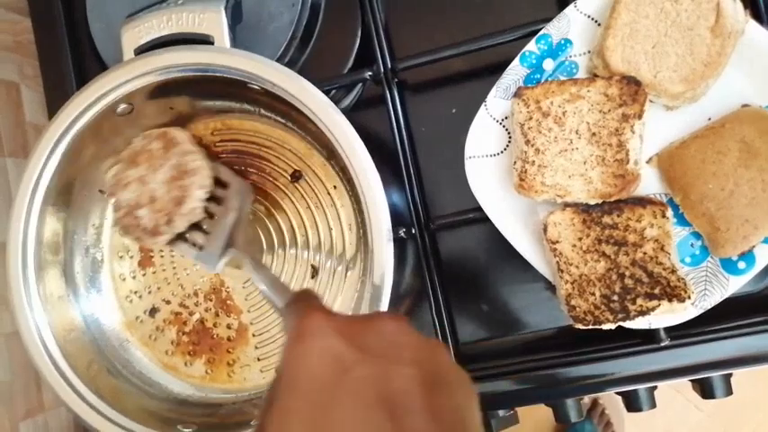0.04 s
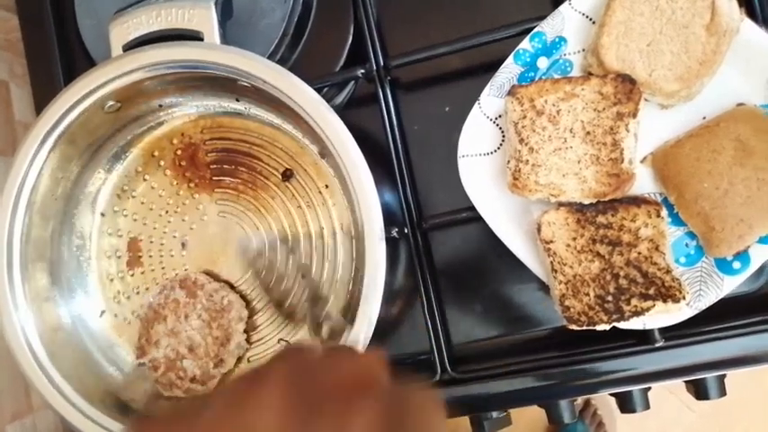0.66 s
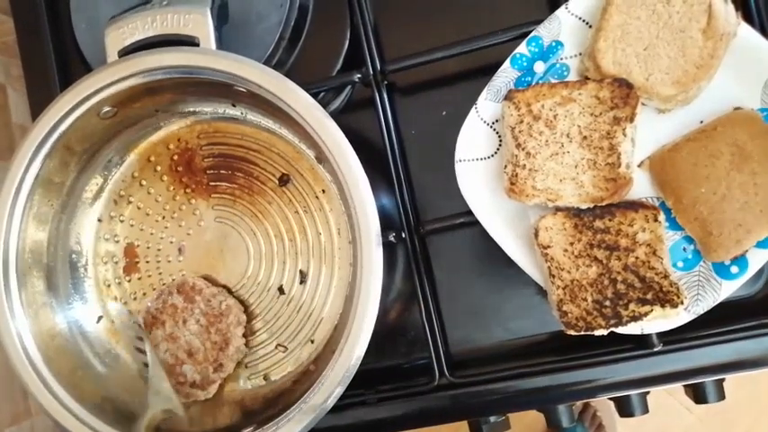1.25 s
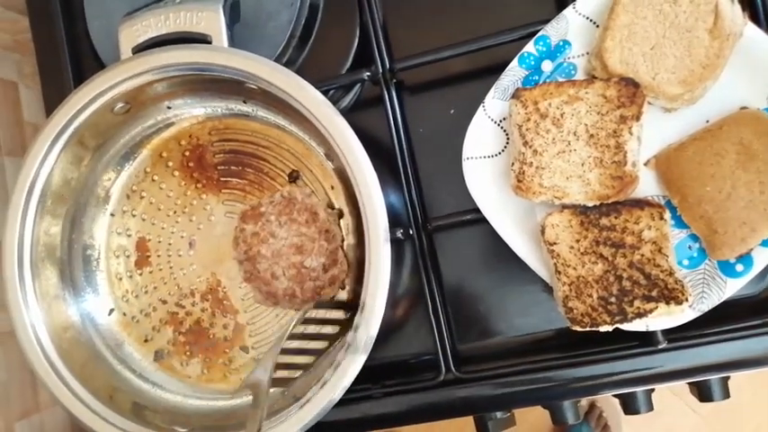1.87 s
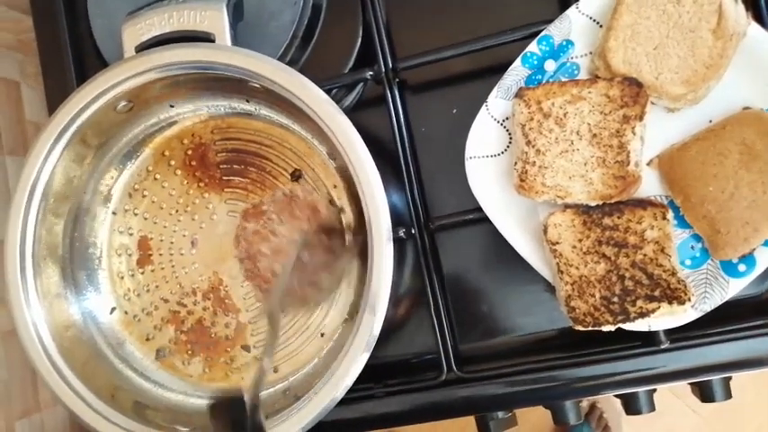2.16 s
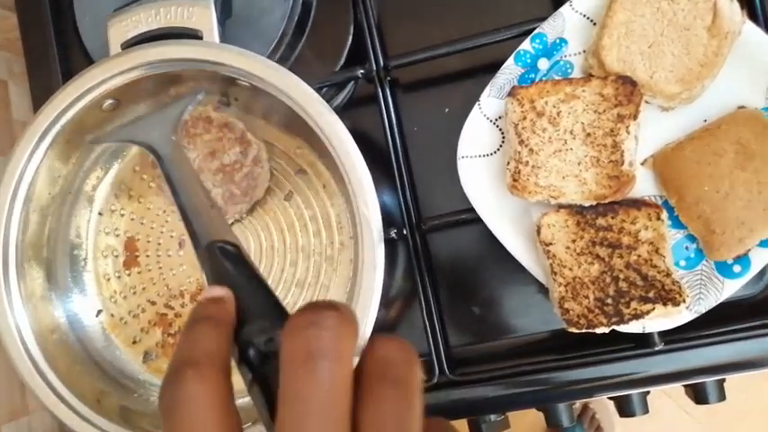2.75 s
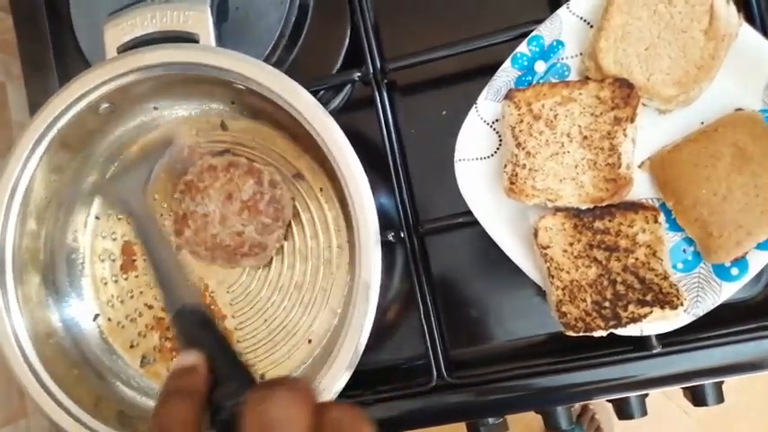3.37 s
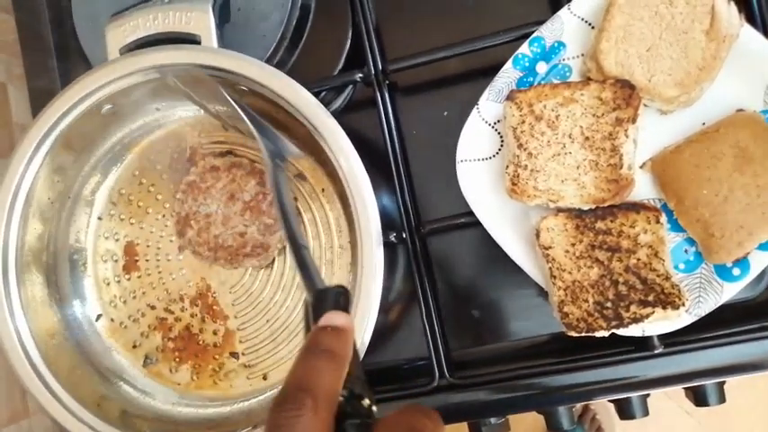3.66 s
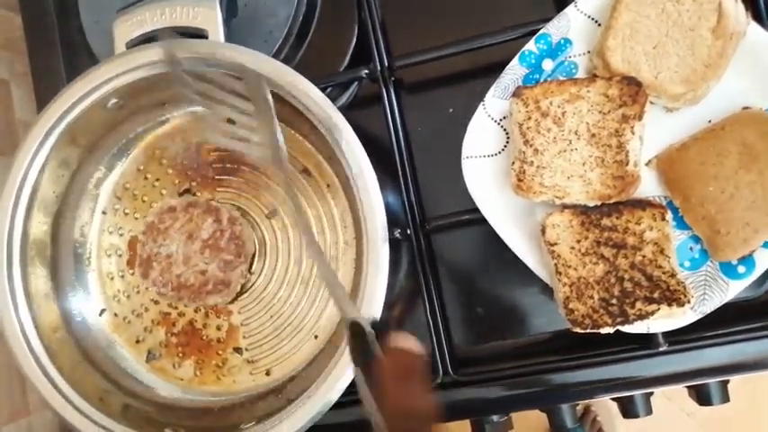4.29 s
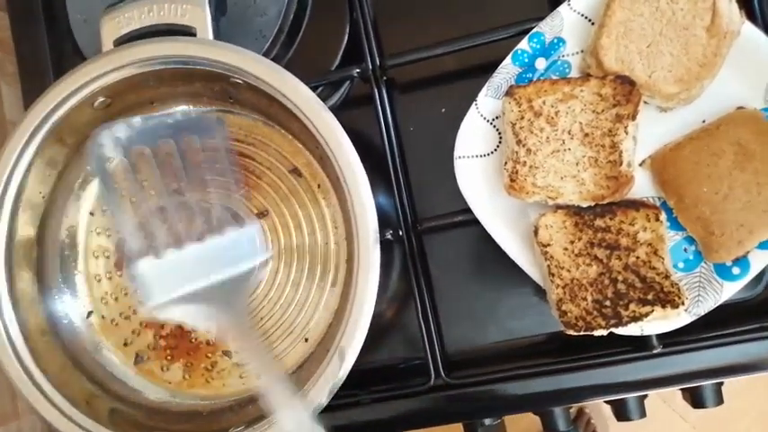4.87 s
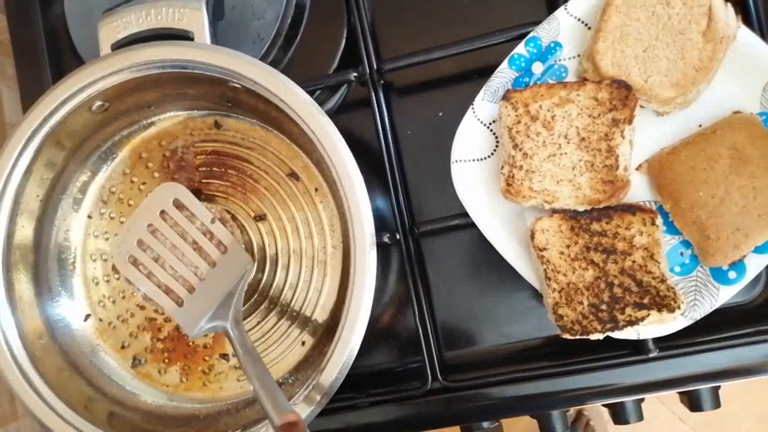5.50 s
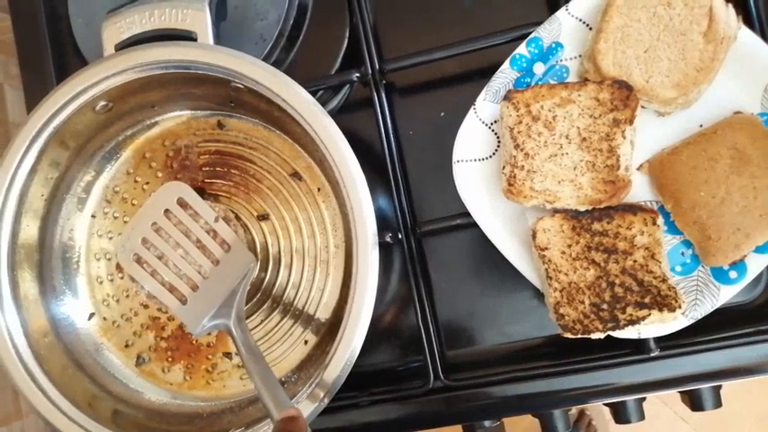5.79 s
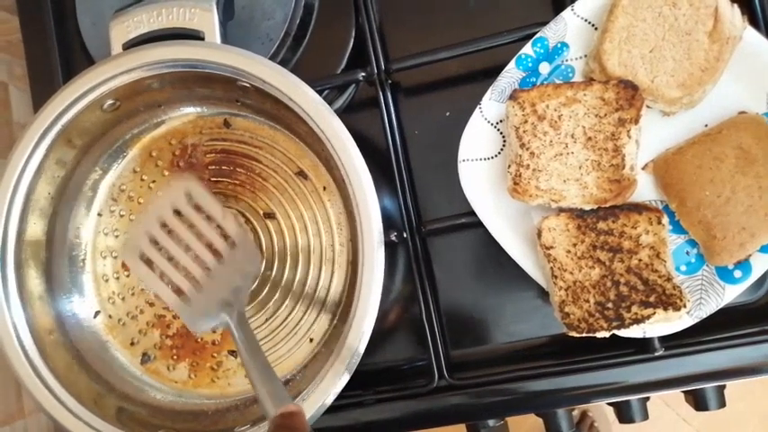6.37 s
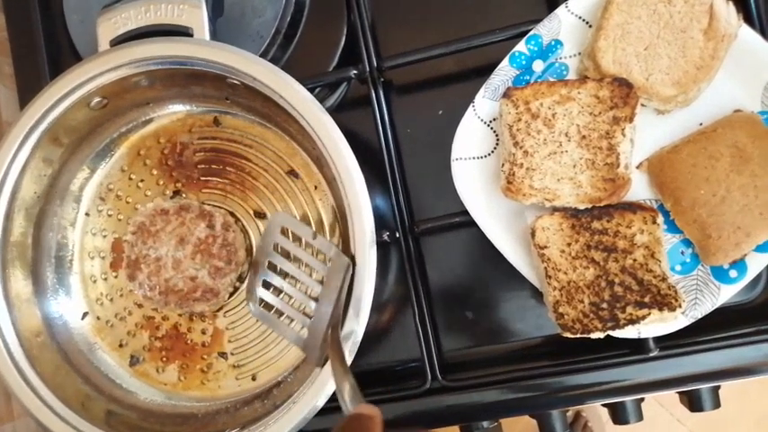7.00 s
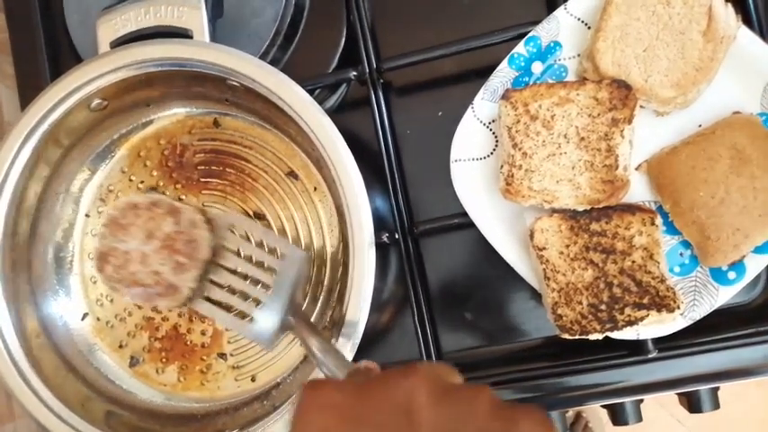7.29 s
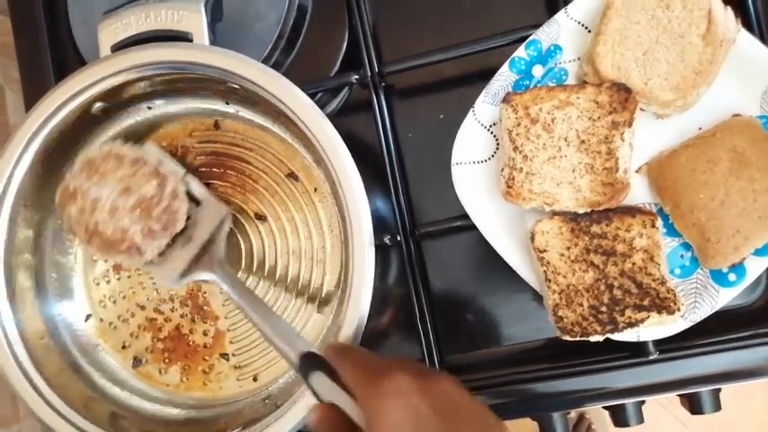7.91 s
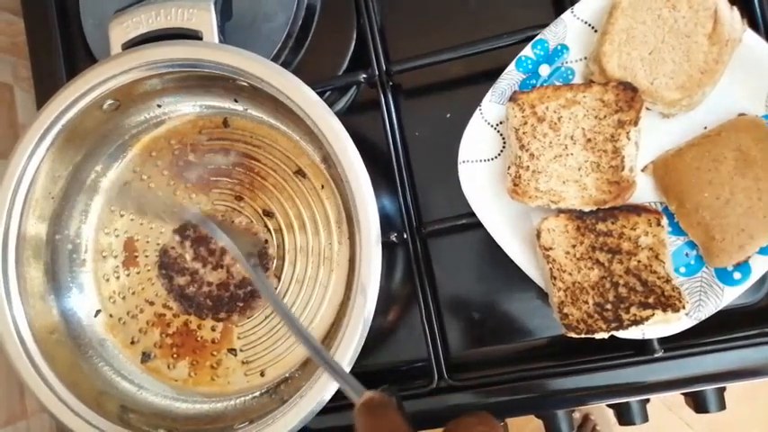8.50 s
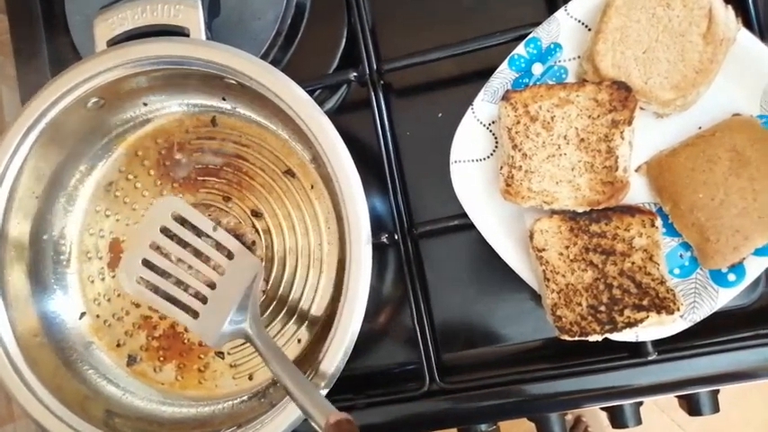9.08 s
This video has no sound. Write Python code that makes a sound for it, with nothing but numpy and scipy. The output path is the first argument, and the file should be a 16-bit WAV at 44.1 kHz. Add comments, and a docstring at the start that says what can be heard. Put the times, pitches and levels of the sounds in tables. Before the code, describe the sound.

A meat patty sizzles in a thin film of oil in a steel pan, heard close up in a small kitchen. A metal spatula scrapes under it and knocks the pan repeatedly, each hit ringing briefly. Midway the spatula rests and the sizzle softens, with a few sharp spits of fat. Then the clatter and scraping return, the patty flops over with a soft thump, and the frying swells, coarser than before.

```python
"""Patty frying in a steel pan

Close by in a small kitchen, a meat patty sizzles in a thin film of oil over a gas burner. Countless
steam bubbles burst under it, harder and coarser when it is pushed onto fresh hot metal, and fat spits.
A slotted metal spatula skids, scrapes under the meat and hits the wall, ringing its blade and the pan."""
import sys
import numpy as np
from scipy import signal
from scipy.fft import rfft, irfft, next_fast_len
from scipy.io import wavfile

SR = 44100
rng = np.random.default_rng(int(sys.argv[2]) if len(sys.argv) > 2 else 0)


def wrap_up_sound(samples):
    """Save the sound to the file named by the first command line argument, as 16-bit audio."""
    columns = np.atleast_2d(samples).T
    # keep every value between -1 and 1, then stretch to whole-number steps
    tamed = np.clip(columns, -1, 1)
    steps = np.round(tamed * 32767).astype(np.int16)
    wavfile.write(sys.argv[1], SR, steps)


N = 407925


def from_db(db):
    """Decibels to gain."""
    return np.exp(np.asarray(db) * (np.log(10) / 20))


def rms_one(x):
    """Scale to rms 1."""
    return x / np.sqrt(np.mean(x ** 2) + 1e-20)


def energy_one(x):
    """Scale each channel to energy 1."""
    return x / np.sqrt(np.sum(x ** 2, axis=-1, keepdims=True) + 1e-20)


def automation(points):
    """A (t/s, value) curve at every sample."""
    return np.interp(np.arange(N) / SR, *np.transpose(points))


def on_bins(points, size):
    """A (f/Hz, value) curve on the bins of an FFT."""
    hz, value = np.transpose(points)
    return np.interp(np.log(np.arange(size // 2 + 1) * SR / size + 1), np.log(hz), value)


def response(points, size=4096):
    """Minimum-phase impulse response of a (f/Hz, level/dB) EQ curve."""
    cepstrum = irfft(np.log(from_db(on_bins(points, size))))
    cepstrum[1:size // 2] *= 2
    cepstrum[size // 2 + 1:] = 0
    return irfft(np.exp(rfft(cepstrum)))


def through(x, impulse):
    """Convolve, keeping the length."""
    return signal.oaconvolve(x, impulse)[:len(x)]


def band(x, low_hz, high_hz, order=2):
    """Butterworth band-pass."""
    sos = signal.butter(order, [low_hz, min(high_hz, .45 * SR)], "band", fs=SR, output="sos")
    return signal.sosfilt(sos, x + 1e-18)


def drift(per_s):
    """Random modulation of rms 1."""
    knots = rng.standard_normal(int(N / SR * per_s) + 2)
    return rms_one(np.interp(np.arange(N) / SR * per_s, np.arange(len(knots)), knots))


def add(track, s, sound):
    """Mix a sound in at time s."""
    start = max(0, round(s * SR))
    track[start:start + len(sound)] += sound[:N - start]


def noise_tail(t60):
    """Noise of energy 1 that dies by 60 dB in t60 seconds."""
    t = np.arange(SR // 2) / SR
    return energy_one(rng.standard_normal(len(t)) * from_db(-60 * t / t60))


def ring(force, modes):
    """Damped modes driven by one force; each mode's level sets its energy."""
    out = np.zeros(len(force))
    for hz, level_db, t60 in modes:
        radius, angle = np.exp(-np.log(1000) / (t60 * SR)), 2 * np.pi * hz / SR
        mode = signal.lfilter([1, 0, -1], [1, -2 * radius * np.cos(angle), radius ** 2], force + 1e-18)
        out += from_db(level_db) * energy_one(mode)
    return out


def crackle(per_s, spread_db):
    """Random clicks, many weak and a few strong, of even power whatever their rate."""
    chance = np.clip(per_s / SR, 1e-4, 1)
    strength = from_db(spread_db * np.minimum(rng.exponential(1, N), 5.5)) * rng.choice([-1, 1], N)
    return rms_one((rng.random(N) < chance) * strength / np.sqrt(chance))


def noise_bed(eq, side_db=-7, waver_db=0.0):
    """Coloured noise in narrow stereo, with an optional waver in level."""
    mid, side = (rms_one(through(rng.standard_normal(N), response(eq))) for _ in range(2))
    return (mid + from_db(side_db) * side * [[1], [-1]]) * from_db(waver_db * drift(10))


# Tone of a burst inside the pan: f/Hz, level/dB
PAN_EQ = [(200, -23), (450, -42), (700, -18.5), (1300, -15.5), (2000, -13.5), (2800, -12), (4000, -13.5),
          (5300, 1.5), (6600, -4.5), (9800, -6), (11200, -9.5), (13500, -3.5), (14950, 6), (15800, -5)]
# Bubble sizes, large to finest spray: low f/Hz, high f/Hz, bursts per s, strength spread/dB,
# level/dB at mean vigour, dB per dB of vigour, dB per dB of splutter
BUBBLE_SIZES = [(446, 2130, 450, 2.5, -57.5, 0.9141, 0.94), (2326, 3930, 1100, 3, -52.5, 1.09, 0.5),
                (3690, 7620, 3400, 2.5, -42, 1, -0.22), (8260, 12000, 2700, 4, -48, 0.9845, 0.3),
                (11970, 15320, 6000, 4, -46, 0.77, 0.5)]


def sizzle(vigour_db, splutter_db, spot_count=4):
    """Steam bubbles burst around the pan, a band per size; snaps across all bands sink as vigour rises."""
    snaps = from_db(-7 - 0.23 * np.maximum(vigour_db, 0)) * crackle(per_s=400, spread_db=4.5)
    cluster_db = 0.13 * drift(110)   # bubbles burst in small clusters
    spot_of = rng.integers(0, spot_count, N)
    colour, spots = response(PAN_EQ, size=1024), np.zeros((spot_count, N))
    for low_hz, high_hz, per_s, spread_db, level_db, by_vigour, by_splutter in BUBBLE_SIZES:
        clicks = crackle(per_s * from_db(0.85 * vigour_db), spread_db) + snaps   # harder means denser
        clicks = rms_one(clicks * from_db(cluster_db + 1.55 * drift(35)))
        clicks *= from_db(level_db + by_vigour * vigour_db + by_splutter * splutter_db)
        burst = energy_one(band(colour, low_hz, high_hz, order=3))
        for k in range(spot_count):
            spots[k] += through(clicks * (spot_of == k), burst)
    return sum(kitchen(spot, room_db=-3.0, echo_db=2.5) for spot in spots)   # each has its own echoes


# Body of the simmer: f/Hz, level/dB
SIMMER_EQ = [(25, 2.5), (45, -6), (100, -3.5), (190, 1.5), (330, -0.5), (500, -0.5), (680, 9),
             (1000, -17.5), (2000, -10)]


def simmer(vigour_db, splutter_db):
    """A dull, wavering simmer under the meat rides the vigour and the splutter."""
    return from_db(-72.5 + 0.52 * vigour_db + splutter_db) * noise_bed(SIMMER_EQ, waver_db=5.0)


# Tone of the gas flame: f/Hz, level/dB
BURNER_EQ = [(20, -21), (40, 11.5), (70, 1), (110, -5), (160, -6), (195, 7), (225, -8), (300, -6),
             (450, -5), (1000, -22), (3000, -19)]


def burner():
    """The gas burner lays a low, steady rush under everything."""
    return from_db(-76.5) * noise_bed(BURNER_EQ)


# Dense, short resonances of metal on metal, for grit, ticks and clatter: f/Hz, level/dB
METAL_EQ = [(120, -47), (330, -24), (700, 5.5), (1500, 3), (2800, 5), (4000, -7), (5500, 9), (7500, 10.5),
            (15000, -39)]
# Modes of the rubbed pan floor: f/Hz, level/dB, t60/s
HISS_MODES = [(5150, -2, .025), (5230, 0, .03), (5355, -1, .03), (5495, 1, .028)]
# Modes of the scraping edge: multiple of the rasp's pitch, level/dB, t60/s
EDGE_MODES = [(.93, 0, 0.01), (1.0, 1, 0.014), (1.1, 1, 0.0088)]
# The blade shoves under the patty or presses on it:
# t/s, length/s, level/dB, rasp f/Hz, hiss over rasp/dB
SHOVE_CUES = [(0, 0.088, -37, 2920, 0), (0.137, 0.19, -47, 2800, -10), (0.427, 0.11, -44.5, 2680, 5),
              (2.208, 1, -54, 2960, 7.5), (6.19, 0.14, -61.5, 2920, 3), (7.307, 0.15, -45.5, 2650, 4),
              (7.45, 0.21, -38, 2600, -1.5), (7.684, 0.091, -46, 2650, 2.5), (7.725, .012, -40, 2550, 1),
              (7.808, 0.19, -48.5, 2830, 2.5)]


def scraping(attack_s=0.0033, release_s=0.021, judder_db=3.0, grit_db=-16):
    """The edge sticks and slips on the crust: a rasp pitched by blade angle, pan-floor hiss, dry grit."""
    out, t = np.zeros(N), np.arange(N) / SR
    slips = crackle(per_s=700, spread_db=2.5) * from_db(judder_db * np.tanh(drift(70)))
    hiss = rms_one(band(ring(slips, HISS_MODES), 4140, 10400))
    grit = rms_one(band(through(slips, response(METAL_EQ)), 1200, 15000))
    for s, length_s, level_db, rasp_hz, hiss_db in SHOVE_CUES:
        pressure = np.clip((t - s) / attack_s, 0, 1) * np.exp(-np.maximum(t - s - length_s, 0) / release_s)
        modes = [(rasp_hz * multiple, db, t60) for multiple, db, t60 in EDGE_MODES]
        rasp = rms_one(band(ring(slips, modes), 1900, 3600))
        out += from_db(level_db) * pressure * (rasp + from_db(hiss_db) * hiss + from_db(grit_db) * grit)
    return kitchen(out, room_db=-4.5)


# The edge catches: t/s, dry peak/dB, centre f/Hz
CATCH_CUES = [(0.007, -19, 3300), (0.517, -28, 2600), (0.527, -27, 2600), (7.452, -22, 2500),
              (7.4648, -15, 2500), (7.531, -20, 2100), (7.6057, -19, 2500), (7.7133, -19, 2400),
              (7.8092, -17, 3100), (7.8207, -17, 2800), (7.826, -23, 2600), (7.883, -23, 1700),
              (7.941, -23, 4500), (9.0737, -24, 2600)]


def catches(width_ratio=1.62, ring_db=-13):
    """The edge snaps free of the crust: one metal tick, damped at once by the meat."""
    out, colour = np.zeros(N), response(METAL_EQ)
    for s, peak_db, hz in CATCH_CUES:
        tick = band(colour, hz / width_ratio, hz * width_ratio)
        tick += from_db(ring_db) * through(tick, noise_tail(t60=0.008))
        add(out, s, from_db(peak_db) * tick / np.abs(tick).max())
    return kitchen(out, room_db=-3.0, echo_db=-9.0)


# Featured spits of fat: t/s, level/dB before the trim
SPIT_CUES = [(0.099, -30), (0.387, -28), (0.6165, -20), (1.4555, -20), (4.8625, -31), (5.168, -29),
             (5.1835, -25.5), (5.4513, -28), (5.5093, -24), (6.087, -21.5), (6.1603, -21.5), (6.1835, -14),
             (6.4347, -41.5), (8.7948, -20), (8.9553, -20)]


def spits(vigour_db, strays_per_s=1.6, stray_db=-36, snap_hz=5590, width_ratio=1.09, trim_db=-5):
    """Water drops burst out of the fat, on cue and at random: a bright snap over a fainter, lower pop."""
    out, colour = np.zeros(N), response(PAN_EQ)
    pop = band(colour, 420, 2600)
    stray_samples = np.flatnonzero(rng.random(N) < strays_per_s / SR)
    strays = [(i / SR, stray_db + vigour_db[i]) for i in stray_samples]
    for s, level_db in list(SPIT_CUES) + strays:
        hz = snap_hz * np.exp(0.032 * rng.standard_normal())
        snap = band(colour, hz / width_ratio, hz * width_ratio)
        spit = snap / np.abs(snap).max() + 0.52 * pop / np.abs(pop).max()
        add(out, s + 0.00098, from_db(level_db + trim_db) * spit)
    return kitchen(out, room_db=-4, echo_db=-4)


# Ring of the pan wall, pan floor and spatula blade: f/Hz, level/dB, t60/s
WALL_RING = [(340, 5, 0.5), (660, 4.5, 0.45), (1748, -5, 0.25), (1772, 1, 0.45), (1800, -6, .15),
             (2257, -2.5, 0.43), (2430, -11, .4), (2737, -1.5, 0.38), (2775, -3.5, 0.18), (3946, -9, 0.42),
             (4560, -11, .35), (5243, -3, 0.27), (5470, -3, 0.3), (5535, -3, 0.33), (5635, -4.5, 0.27),
             (5690, -3.5, 0.25), (5757, -3, .3), (6376, -12, 0.38)]
FLOOR_RING = [(782, -3, 0.45), (1047, -1, 0.33), (1426, -4, 0.3), (1577, -1, 0.46), (1771, -3, .35)]
BLADE_RING = [(335, 4, 0.3), (412, -1.5, 0.3), (1015, -6, 0.25), (1340, 2, 0.6), (1368, -7, 0.14),
              (2196, -5, 0.16), (2260, -3, .2), (2430, -2, 0.31), (2541, -3, 0.28), (2611, -8, 0.3),
              (3120, -7, .08), (3160, -2, 0.27), (3580, -11, 0.2), (4375, -3, .25)]
# Spatula hits and skids: t/s, clatter/dB, wall/dB, floor/dB, blade/dB, thud/dB, contact centre f/Hz,
# mode roll-off from that centre/(dB per octave), chatter decay/s
TOUCH_CUES = [(0.274, -11, -39, -36, -43, -82, 965, 9, 0.013),
              (1.066, -7.5, -33, -19, -32, -58, 1980, 4.5, 0.037),
              (1.779, -4, -39, -18, -10.5, -65, 3320, 13, 0.053),
              (2.045, -4, -20, -34, -29, -59, 1200, 9, 0.28),
              (2.329, -4.5, -32, -38, -37, -65, 1190, 9, 0.05),
              (2.73, -12.5, -32, -36, -41, -65, 1130, 10, 0.016),
              (3.151, -9, -29, -33, -31, -73, 1360, 8, 0.13),
              (3.738, -6.5, -36, -32, -16.5, -59, 1970, 7.5, 0.019),
              (3.831, -2, -22, -27, -28, -57, 1500, 6, 0.01),
              (3.8335, -9, -0.5, -30, -28, -58, 5700, 7, 0.004),
              (3.854, -5.5, -10.5, -30, -30, -55, 2000, 5, 0.073),
              (3.976, -9, -14, -32, -34, -61, 1900, 6, 0.012),
              (4.113, -15, -38, -43, -33, -73, 1970, 6, 0.028),
              (6.762, -22, -47, -45, -15, -67, 1570, 7.5, 0.23),
              (6.885, -13.5, -41, -29, -16.5, -57, 2160, 5, 0.052),
              (6.981, -0.5, -13, -14.5, -14, -56, 1750, 4, 0.055),
              (7.03, -5, -12, -13, -10, -57, 1400, 4, 0.04), (7.23, -5, -18, -10, -20, -78, 1300, 13, 0.14),
              (9.073, -6, -23, -30, -41, -57, 1280, 9.5, 0.01)]


def spatula(slips_per_s=900, first_blow=1.97, flutter_db=2.2):
    """A blow and a fading run of slips drive a short clatter and ring the wall, floor and blade."""
    rings, contacts = np.zeros((2, N))
    t = np.arange(SR * 3 // 4) / SR
    for s, clatter_db, wall_db, floor_db, blade_db, _, centre_hz, rolloff_db, chatter_s in TOUCH_CUES:
        slipping = rng.random(len(t)) < slips_per_s / SR
        slips = slipping * rng.standard_normal(len(t)) * np.exp(-t / chatter_s)
        slips[0] = first_blow
        add(contacts, s, from_db(clatter_db) * band(energy_one(slips), centre_hz * 0.42, centre_hz * 2.07))
        for modes, part_db in ((WALL_RING, wall_db), (FLOOR_RING, floor_db), (BLADE_RING, blade_db)):
            driven = [(hz, part_db + db - rolloff_db * abs(np.log2(hz / centre_hz)), t60)
                      for hz, db, t60 in modes]
            add(rings, s, ring(slips, driven))
    rings *= from_db(flutter_db * drift(90))   # loose contact roughens the ring
    ringing = kitchen(rings, room_db=-9)
    crack = through(contacts, response(METAL_EQ))
    clatter = 0.45 * crack + through(crack, noise_tail(t60=0.055))
    return ringing + kitchen(clatter, room_db=1.0)


def thumps(cues, attack_s, t60):
    """A dull, damped burst of noise for each (t/s, level/dB, centre f/Hz) cue."""
    out, t = np.zeros(N), np.arange(SR) / SR
    envelope = np.minimum(t / attack_s, 1) * from_db(-60 * t / t60)
    for s, level_db, hz in cues:
        rumble = rms_one(band(rng.standard_normal(len(t)), hz / 1.4, hz * 1.37))
        add(out, s, from_db(level_db) * rumble * envelope)
    return out


def pan_thuds(centre_hz=415):
    """Every hit or skid of the spatula also jolts the pan on its grate."""
    cues = [(s, thud_db, centre_hz) for s, _, _, _, _, thud_db, *_ in TOUCH_CUES]
    return thumps(cues, attack_s=0.0059, t60=0.64)


# The meat lands: t/s, level/dB, centre f/Hz
FLOP_CUES = [(0.41, -51, 366), (0.615, -57.5, 403), (1.975, -62, 350), (8.22, -60, 410), (8.25, -43.5, 765),
             (8.35, -50, 690)]


def patty_flops():
    """The patty flops over or slumps against the wall with a soft thump."""
    return thumps(FLOP_CUES, attack_s=0.01, t60=0.37)


# Rumble of the grate and stove top: f/Hz, level/dB
GRATE_EQ = [(20, -12), (50, 1), (90, -8), (140, -5), (200, 1), (280, -6), (500, -12.5), (2000, -60)]
# The pan is pushed: t/s, level/dB
SHIFT_CUES = [(0.52, -62.5), (1.12, -65.5), (2.122, -68), (3.75, -65), (3.899, -63), (6.9, -60),
              (7.569, -57.5), (8.25, -59.5)]


def pan_shifts(t60=2.94):
    """The pushed pan shifts on its grate and the stove top rumbles for a second."""
    out, t = np.zeros(N), np.arange(SR) / SR
    for s, level_db in SHIFT_CUES:
        rumble = rms_one(through(rng.standard_normal(len(t)), response(GRATE_EQ)))
        add(out, s, from_db(level_db) * rumble * from_db(-60 * t / t60))
    return out


def kitchen(x, room_db, echo_db=None):
    """Mono to stereo: direct sound, a short room tail and, with echo_db, quick echoes off the pan wall."""
    impulses = []
    for _ in range(2):
        impulse = from_db(room_db) * band(noise_tail(t60=0.26), 340, 18700, order=1)
        if echo_db is not None:
            impulse += from_db(echo_db) * band(noise_tail(t60=0.081), 480, 20200, order=1)
        impulse[0] += 1
        impulses.append(energy_one(impulse))
    return signal.fftconvolve([x], impulses, axes=1)[:, :N]


# How hard the meat fries; only the swing about the mean counts: t/s, level/dB
VIGOUR_CURVE = [(0.0, -38.5), (0.23, -38.5), (0.86, -42), (0.92, -49.5), (1.23, -45), (1.32, -44),
                (1.65, -44), (2.13, -42.5), (2.24, -38), (3.0, -43), (3.25, -40.5), (3.75, -42.5),
                (4.17, -45), (4.27, -47.5), (4.77, -53.5), (5.33, -54), (6.0, -47.5), (6.13, -48.5),
                (6.26, -46.5), (6.47, -53.5), (6.8, -53.5), (7.5, -39), (7.96, -43), (8.05, -47),
                (8.2, -37.5), (8.37, -37), (8.62, -38.5), (8.85, -42), (9.09, -42), (9.15, -40.5),
                (9.25, -41.5)]
# The wet meat's coarse splutter dips twice, builds up towards the flip and stays strong: t/s, level/dB
SPLUTTER_CURVE = [(0, 1), (0.85, 0), (0.91, -4.5), (1.05, 0.5), (1.12, 1.5), (2.1, 1), (3.5, 1), (4.3, 0.5),
                  (6.18, 0), (6.28, -6), (6.75, 2), (7.3, 3), (8.08, 5), (8.18, 4.5), (9.25, 5.5)]


def scene():
    """The stereo mix: frying and spatula work over a bed of simmer and burner."""
    vigour_db, splutter_db = automation(VIGOUR_CURVE), automation(SPLUTTER_CURVE)
    vigour_db -= vigour_db.mean()
    bed = simmer(vigour_db, splutter_db) + burner()
    fat = spits(vigour_db)
    metal = spatula() + catches() + scraping()
    knocks = kitchen(pan_thuds() + patty_flops() + pan_shifts(), room_db=3.0)
    return sizzle(vigour_db, splutter_db) + bed + fat + metal + knocks


# Balance of the two microphone ports: f/Hz, left minus right/dB
STEREO_BALANCE = [(300, -7.5), (620, 2.5), (1400, -10.5), (1950, -4.5), (2400, -11), (3500, -5),
                  (5300, -13), (7000, 0.5), (8600, 6), (10000, 6), (13000, -0.5), (15000, -7.5)]
# Phase between the channels; right trails in the lows and mids, in step above 6 kHz: f/Hz, phase/rad
STEREO_PHASE = [(60, 0), (300, .25), (800, 1.3), (1300, 2.4), (2100, 3.2), (3300, 6.2), (4300, 10),
                (5100, 13.2), (6000, 12.57), (16000, 12.57)]


def record(dry, cutoff_hz=16000):
    """The channels differ in colour and, below 6 kHz, in phase; a steep filter cuts the top."""
    size = next_fast_len(N + 1024)
    left = from_db(on_bins(STEREO_BALANCE, size))
    right = np.exp(-1j * on_bins(STEREO_PHASE, size))
    ports = np.array([left, right]) * np.sqrt(2 / (1 + left ** 2))   # constant total power
    heard = irfft(rfft(dry, size) * ports, size)[:, :N]
    return signal.sosfilt(signal.ellip(12, .1, 80, cutoff_hz, fs=SR, output="sos"), heard)


dry = scene()
out = record(dry)
wrap_up_sound(out)
```